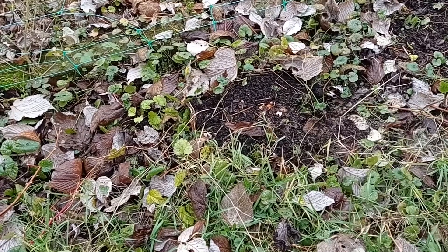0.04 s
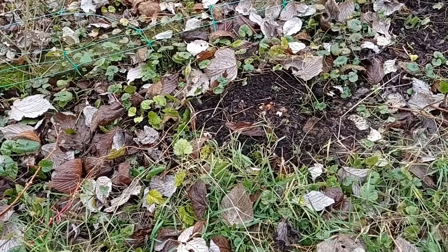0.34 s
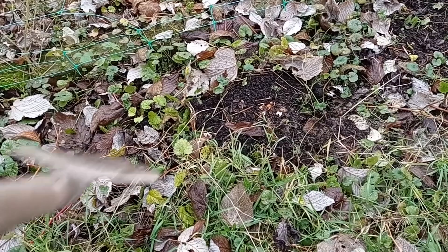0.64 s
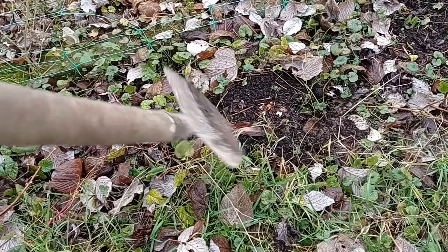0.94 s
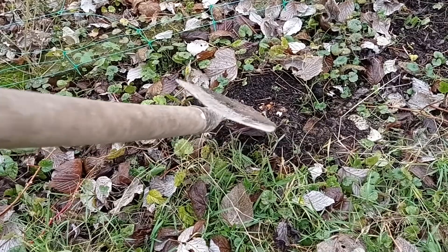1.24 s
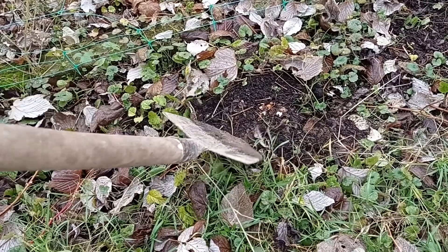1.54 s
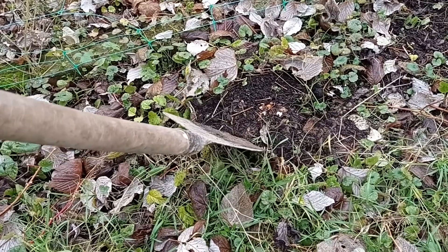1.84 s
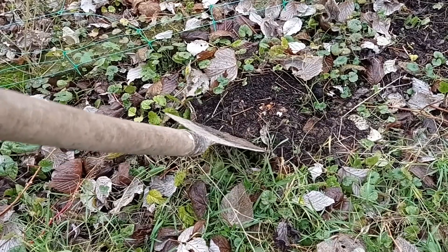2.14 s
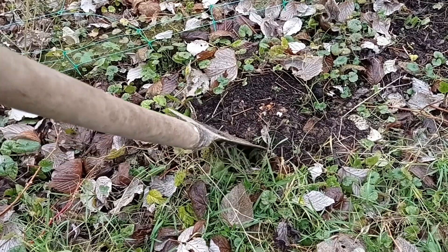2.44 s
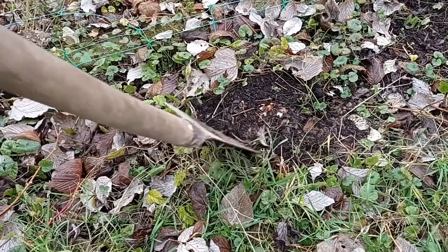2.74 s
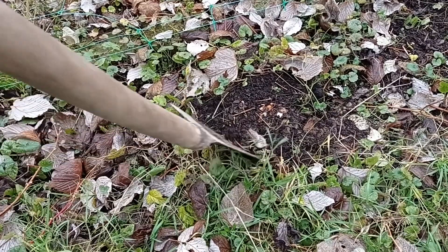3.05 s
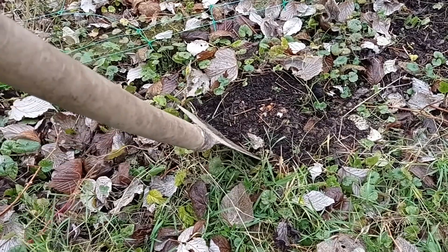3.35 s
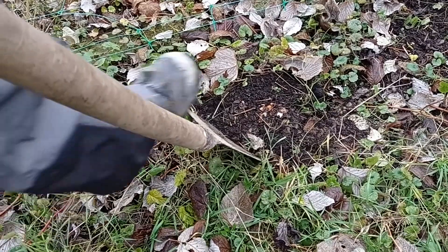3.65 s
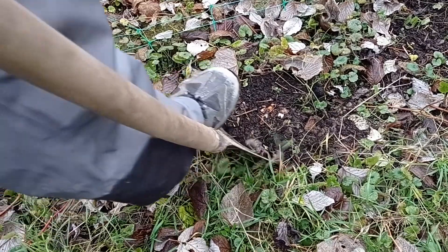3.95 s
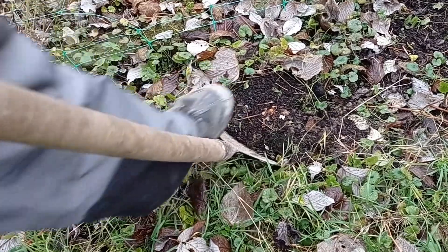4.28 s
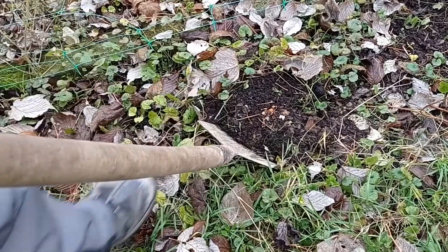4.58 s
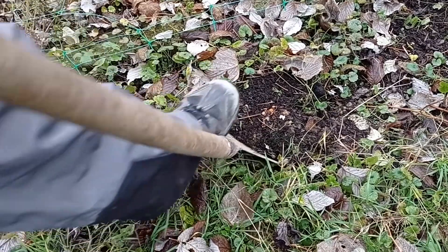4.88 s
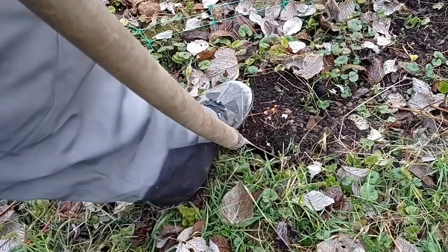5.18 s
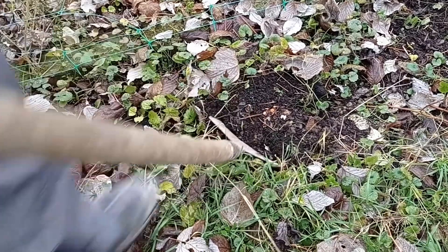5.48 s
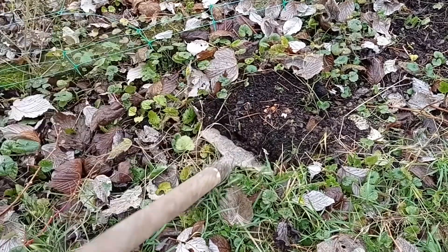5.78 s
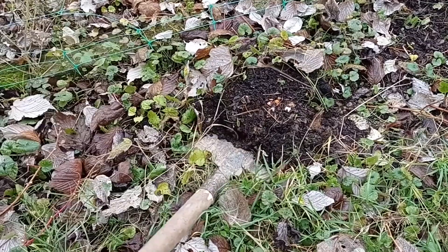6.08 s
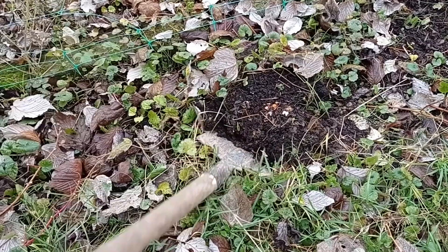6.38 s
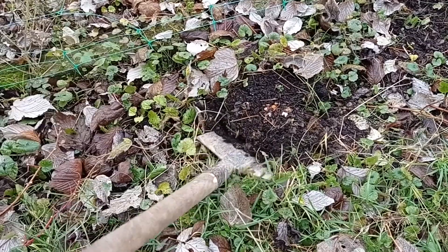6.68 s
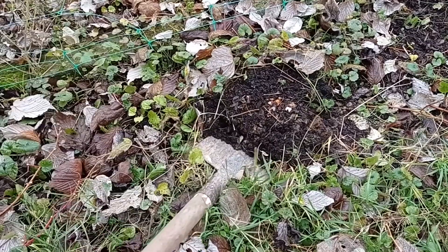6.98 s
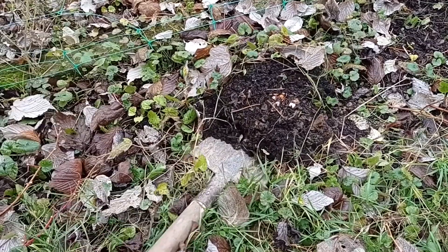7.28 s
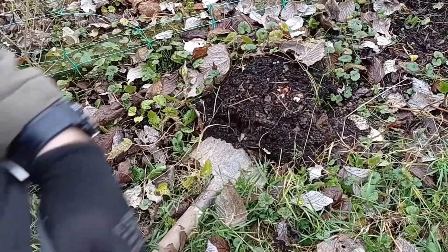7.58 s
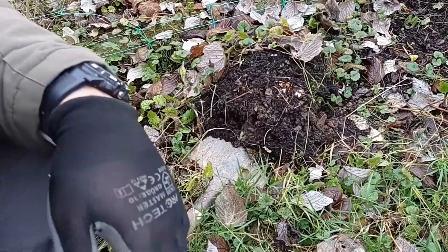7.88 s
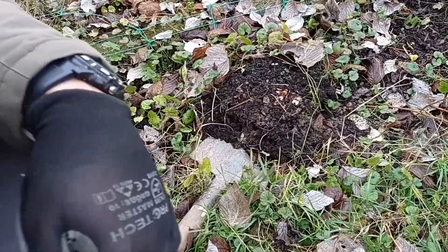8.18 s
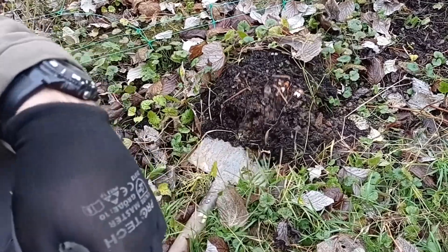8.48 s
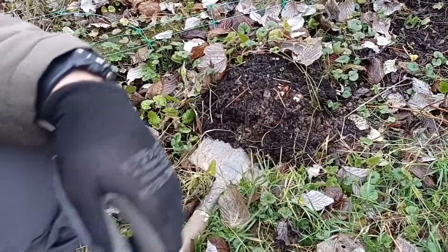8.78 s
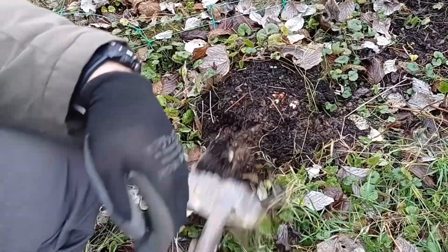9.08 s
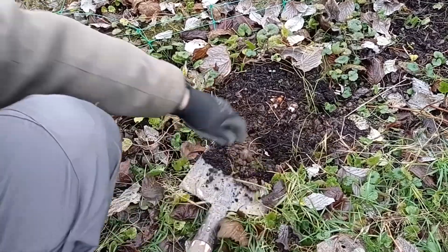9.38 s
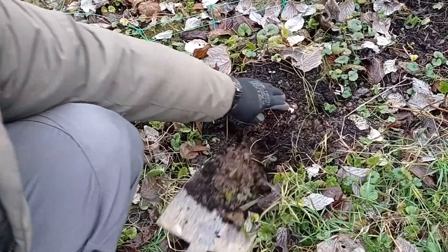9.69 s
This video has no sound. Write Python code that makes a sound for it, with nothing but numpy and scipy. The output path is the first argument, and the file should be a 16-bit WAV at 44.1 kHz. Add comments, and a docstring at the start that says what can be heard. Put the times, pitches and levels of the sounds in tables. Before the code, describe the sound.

Someone digs with a spade close to the microphone, outdoors. Short gritty jabs and small metallic clinks come first, then two heavier crunching thuds as a boot drives the blade home. Turf rips and roots break in a string of woody cracks while crumbs of earth fall. Rustling clothing, soft boot scuffs and ticking dry leaves run throughout, with still air and a faint hum behind.

```python
"""A boot steps on a leafy garden bed with a short crunch; then a steel spade is set in. It grates on grit
and clinks on stones, which excite its damped modes, and is trodden in twice with a dull boom.
As it is levered back the sod tears and roots snap, each fracture an impulse that rings wood and soil.
Boots scuff, leaves crackle, crumbs fall, and friction makes the digger's clothes swish close by.
Behind it all lie quiet open air and a faint low hum."""
import sys
import numpy as np
from scipy import signal
from scipy.fft import rfft, irfft
from scipy.io import wavfile

SR = 44100
rng = np.random.default_rng(int(sys.argv[2]) if len(sys.argv) > 2 else 0)


def unload_wav(signal):
    """Save mono or channel-first audio to the path in sys.argv[1] as 16-bit WAV at rate SR, clipped to [-1, 1]."""
    wavfile.write(
        sys.argv[1],
        SR,
        np.round(np.clip(np.atleast_2d(signal).T, -1, 1) * 32767).astype(np.int16),
    )


N = 429093

# A boot (first row), then the blade, crushes the sod.
# Each row: start and length in seconds, then crunch, grit, thud and swell in dB.
SOD_CRUSHES = [(0.027, 0.051, -54.5, -48.5, -46, -3), (0.897, 0.084, -49, -41, -53, -24),
               (3.867, 0.1, -50.5, -55, -65, 8), (3.995, 0.066, -38, -46, -50.5, -1),
               (4.053, 0.052, -34, -32.5, -45, -5), (4.137, 0.036, -40.5, -42, -42, 6),
               (5.12, 0.029, -45, -50, -43.5, 8), (5.16, 0.062, -34, -31.5, -36, 6.5),
               (9.343, 0.025, -43.5, -48, -58, 13)]
# Jabs against grit. Each row: peak time in seconds, crunch, bright edge and thud in dB,
# rise time and 60 dB decay time in seconds.
GRIT_JABS = [(0.893, -37, -26.5, -35, 0.0015, 0.023), (1.415, -46, -23.5, -85, 0.0011, 0.088),
             (1.471, -47.5, -38.5, -87, 0.0028, 0.097), (2.171, -50, -36.5, -80, 0.001, 0.014),
             (2.368, -61, -41, -81, 0.0024, 0.12), (2.404, -45.5, -53, -64, 0.003, 0.041),
             (2.615, -37, -25.5, -60, 0.0083, 0.028), (2.639, -51, -42, -55, 0.011, 0.072),
             (2.662, -47, -26.5, -58, 0.0066, 0.02), (2.869, -57, -38.5, -70, 0.012, 0.09),
             (2.88, -32.5, -31, -41.5, 0.002, 0.065), (2.921, -46.5, -54, -66, 0.0009, 0.016),
             (2.994, -64, -45, -88, 0.0072, 0.044), (3.113, -58, -32, -64, 0.0018, 0.052),
             (3.122, -29.5, -28, -40, 0.0016, 0.029), (3.793, -52.5, -51, -91, 0.00075, 0.19),
             (3.878, -48.5, -59, -81, 0.0015, 0.046), (3.965, -37.5, -34, -56, 0.0009, 0.019),
             (4.016, -30, -20.5, -59, 0.0022, 0.024), (4.061, -27.5, -31, -60, 0.011, 0.03),
             (4.144, -32, -42, -54, 0.0064, 0.061), (4.954, -58, -42.5, -80, 0.006, 0.04),
             (5.217, -23.5, -23, -49, 0.0072, 0.048), (6.713, -31.5, -40, -77, 0.00075, 0.028),
             (6.739, -39, -39, -77, 0.004, 0.04), (9.346, -32, -58, -57, 0.0039, 0.062),
             (9.441, -34, -31, -67, 0.0014, 0.027)]
# Steel striking stone. Each row: time in seconds, level in dB, most strongly excited frequency in Hz.
STONE_STRIKES = [(1.415, -26, 5130), (1.424, -27.5, 5500), (1.47, -53, 3200), (2.17, -46.5, 6700),
                 (2.612, -24, 4540), (2.658, -30, 3500), (2.88, -22.5, 1490), (3.113, -46, 2800),
                 (3.122, -22, 1080), (4.015, -33, 7000)]
# Modes of the steel blade. Each row: frequency in Hz, bandwidth in Hz, level in dB.
BLADE_MODES = [(835, 49, -3.5), (1370, 87, -9), (1985, 33, -8.5), (2246, 45, -1), (2680, 50, -9),
               (2930, 57, -7.5), (3200, 52, -21), (4630, 55, -7), (5110, 89, -2), (5750, 60, 2.5),
               (6375, 130, 2.5), (7550, 150, -12), (6600, 80, 0), (7670, 70, -33)]
# How freely the blade rings; soil damps it as it sinks. Each row: time in seconds, gain in dB.
BLADE_FREEDOM = [(0, 1.5), (0.95, -1.5), (1.3, 6), (2.7, 10.5), (3.1, -12), (4.0, -8), (5.2, -33),
                 (9.73, 5.5)]
# The boot rams the blade home. Each row: start in seconds, length in seconds, level in dB.
BOOT_TREADS = [(4.143, 0.016, -41.5), (5.158, 0.06, -35)]
# The levered turf tears. Each row: start and length in seconds, level and swell in dB.
SOD_TEARS = [(6.412, 0.147, -45.5, 11.5), (6.57, 0.059, -31.5, 3.5), (6.681, 0.049, -40.5, 4.5),
             (6.733, 0.052, -37, 2.5), (9.056, 0.062, -48, 9), (9.119, 0.051, -37, -3),
             (9.16, 0.06, -49, -16), (9.35, 0.033, -45.5, 11)]
# Roots and twigs break. Each row: time in seconds, thump, knock and crack in dB, knock pitch in Hz.
ROOT_SNAPS = [(1.2517, -52, -56, -73, 865), (4.612, -70, -47.5, -67, 1000), (5.125, -58, -30, -37, 1440),
              (5.142, -43, -48, -27.5, 814), (5.2478, -53, -40, -38, 770), (5.4355, -48, -42.5, -42, 1420),
              (5.5865, -77, -42, -45, 930), (5.6974, -63, -30.5, -36, 740), (5.7243, -76, -33, -33, 1400),
              (5.7905, -50, -38, -46.5, 940), (5.896, -49, -33, -37, 1180), (5.998, -54, -40, -35, 840),
              (6.065, -47, -57, -52, 1080), (6.0833, -51, -39.5, -46, 1020), (6.2024, -55, -54.5, -41, 820),
              (6.2907, -47, -54, -58, 1030), (6.9226, -70.5, -36, -51, 1050),
              (7.1664, -39, -18.5, -22.5, 685), (7.252, -51, -40, -37.5, 1370),
              (7.2815, -42, -35, -52, 875), (7.304, -39.5, -36, -39, 800), (7.3597, -45, -36.5, -39, 830),
              (7.4043, -64, -38, -38, 1540), (7.4758, -50, -52, -42, 1100), (7.603, -28, -25.5, -22.5, 610),
              (7.6499, -35, -58, -55, 820), (7.8706, -28.5, -22, -23.5, 770),
              (7.9083, -40.5, -35.5, -58, 1240), (8.4865, -73.5, -46, -40, 1090),
              (8.5265, -39, -21.5, -22.5, 1490), (8.558, -49, -34, -42, 1460), (8.609, -54, -39, -39, 1180),
              (9.154, -75, -30, -32, 1210), (9.415, -69, -31, -51, 1500)]
# Boots scuff damp ground. Each row: time in seconds, level in dB, pitch in Hz.
BOOT_SCUFFS = [(0.16, -45.5, 595), (0.195, -45, 435), (0.271, -48.5, 566), (0.3, -52, 690), (0.5, -50, 486),
               (0.528, -48, 670), (0.809, -51, 780), (1.234, -54, 334), (1.832, -51, 560),
               (3.29, -47.5, 580), (3.36, -50, 640), (3.828, -53.5, 640), (5.03, -52.5, 620),
               (5.927, -48, 580.0), (5.962, -56, 455), (8.593, -39, 504), (8.971, -42.5, 830)]
# How much the bed is disturbed. Each row: time in seconds, level in dB.
DISTURBANCE = [(0.0, -57.5), (0.51, -78.5), (0.89, -69.5), (1.05, -74), (1.54, -83.5), (3.87, -76),
               (4.04, -66), (4.63, -80.5), (4.93, -75), (5.25, -59.5), (5.55, -67), (5.96, -60),
               (6.23, -69), (7.13, -63.5), (7.43, -58), (8.86, -64), (8.97, -58), (9.73, -63)]
# Clods slump and crumble. Each row: start in seconds, length in seconds, level in dB.
CLOD_SLUMPS = [(0.172, 0.13, -61.5), (0.506, 0.11, -66), (1.828, 0.06, -69), (5.755, 0.031, -57),
               (7.28, 0.093, -55), (7.6, 0.073, -49), (7.83, 0.27, -58), (8.154, 0.063, -70),
               (8.51, 0.09, -54.5), (9.0, 0.08, -61)]
# How much the digger moves. Each row: time in seconds, level in dB.
BODY_MOTION = [(0.0, -60), (0.81, -48.5), (1.03, -60), (1.54, -62), (2.68, -74), (3.2, -74), (3.82, -66.5),
               (4.04, -51), (4.66, -67.5), (5.94, -53), (6.45, -54), (6.61, -53.5), (6.8, -56.5),
               (7.56, -54), (8.16, -59.5), (8.83, -54.5), (9.16, -53.5), (9.73, -52)]
# A sleeve or trouser leg sweeps past. Each row: start and length in seconds, level and swell in dB.
LIMB_SWEEPS = [(0.04, 0.33, -57, -2), (0.48, 0.12, -53.5, 2), (0.744, 0.115, -48, 8),
               (0.974, 0.28, -58, -8), (1.333, 0.12, -54.5, 3), (1.625, 0.32, -53, -3.5),
               (2.031, 0.053, -57.5, 3), (2.14, 0.15, -61.5, 1), (2.308, 0.085, -54.5, 3),
               (2.482, 0.014, -61.5, 13), (2.762, 0.016, -57.5, 5), (2.994, 0.041, -61, -8),
               (3.146, 0.23, -48.5, 0), (4.252, 0.15, -53, 0), (4.44, 0.12, -58.5, 2),
               (4.645, 0.033, -65, 0), (4.8, 0.3, -61.5, 11), (5.285, 0.3, -58.5, -1),
               (5.573, 0.85, -55.5, -5.5), (6.326, 0.076, -65, -10), (6.818, 0.23, -60, -11),
               (7.05, 0.17, -54.5, -5), (7.324, 0.16, -50.5, -4), (7.51, 0.64, -58.5, -7),
               (8.12, 0.11, -86, -3), (8.414, 0.17, -53, 15), (8.881, 0.14, -54, 9.5),
               (9.083, 0.14, -46.5, -1.5), (9.268, 0.056, -45, 3.5), (9.43, 0.079, -61, -22),
               (9.637, 0.082, -48.5, -1.5)]
# A far hum swells and fades. Each row: time in seconds, level in dB.
HUM_LEVELS = [(0.0, -75), (0.19, -68), (1.84, -100), (2.09, -73), (3.28, -68), (3.98, -81), (4.09, -74),
              (4.77, -87), (5.2, -54), (5.8, -79), (5.94, -64), (6.29, -97), (6.61, -74), (6.96, -86),
              (7.78, -58), (8.05, -75), (8.24, -60.5), (9.73, -61)]

# Spectra. Each row: frequency in Hz, gain in dB.
CRUNCH_SPECTRUM = [(200, -52.5), (550, -12.5), (950, 1.5), (1400, 0), (2100, 5), (3200, -1), (4500, -6),
                   (8000, -9.5), (16000, -69)]   # crushed grains and fibres
SAND_SPECTRUM = [(1800, -21), (3200, 4.5), (4200, 3.5), (7000, 2), (9000, 2.5), (16000, 0)]   # grit inside the soil
EDGE_SPECTRUM = [(1800, -25), (3200, -10.5), (4200, -8), (7000, -0.5), (16000, -3.5)]   # brighter grit at the bare edge
THUD_SPECTRUM = [(35, -29), (70, -9), (150, 2), (270, -1.5), (400, -6.5), (560, -4.5), (900, -12),
                 (2500, -28.5)]   # struck soil
TURF_SPECTRUM = [(200, -30), (550, -9.5), (950, -1.5), (1500, -2.5), (2300, -2.5), (3300, -1.5),
                 (4500, -1.5), (6500, -2.5), (9000, -16), (16000, -15)]   # breaking grass roots
CRUMB_SPECTRUM = [(35, -27), (70, -7), (130, -1.5), (250, 1), (400, -3.5), (560, -4), (900, -11.5),
                  (2500, -37)]   # falling crumbs
FOLD_SPECTRUM = [(150, -45.5), (350, -10.5), (560, 0), (900, 2), (1400, 1), (2100, 0.5), (3200, -13.5),
                 (6000, -37.5)]   # rubbing folds of cloth
WEAVE_SPECTRUM = [(1200, -15), (2600, -1), (4000, -1.5), (6500, 1), (9000, 1), (16000, 4)]   # the sliding surface of cloth
AIR_SPECTRUM = [(25, 24.5), (60, -2.5), (130, 10), (280, -12), (700, -34), (1700, 7.5), (2800, -15),
                (7000, -8), (16000, -5)]   # still outdoor air
MICROPHONE_RESPONSE = [(25, -26), (60, -0.5), (5500, -0.5), (7100, 0.5), (8200, -7.5), (10000, -16.5),
                       (12000, -26), (13700, -29), (14800, -18), (16000, -23)]


def crushing(crunch, grit, thud):
    """Stick-slip friction: the blade and a boot crush the sod in jerks, crunching grains and fibres."""
    jerks = rms_one(from_db(2 * drift(per_s=300)))
    fibres = colour(grains(per_s=2600, spread_db=1.5), CRUNCH_SPECTRUM)
    fibres = hollows(fibres, patchy_db=2.5, per_s=45)
    sand = colour(grains(per_s=7000, spread_db=3), SAND_SPECTRUM)
    sand = rms_one(scatter(sand, tail_db=-12.5, t60=0.0058))
    soil = rms_one(colour(grains(per_s=1500, spread_db=1), THUD_SPECTRUM))
    contact = jerks * (from_db(-2.5) * crunch * fibres + from_db(2) * grit * sand)
    return blade(contact, ring_db=2.5) + from_db(1) * jerks * thud * soil


def crush_forces():
    """Common excitation: one force envelope drives the crunch, grit and thud of each crush."""
    out = np.zeros((3, N))
    for start, length, *levels_db, swell_db in SOD_CRUSHES:
        force = envelope(start, length, attack_s=0.02, release_s=0.03, swell_db=swell_db)
        out += np.outer(from_db(levels_db), force)
    return out


def jabs(drag_db=-25, drag_t60=0.29, thump_hz=240, lead_s=0.04):
    """Impact and friction: a burst of grit on steel dies fast into a weaker drag, and the soil thuds."""
    t = np.arange(SR // 4) / SR - lead_s
    before, after = np.maximum(-t, 0), np.maximum(t, 0)
    crunch, edge, thud, blows = np.zeros((4, N))
    for s, crunch_db, edge_db, thud_db, rise, t60 in GRIT_JABS:
        fall = from_db(-60 * after / t60) + from_db(drag_db - 60 * after / drag_t60)
        force = np.exp(-(before / rise) ** 2) * fall
        add(crunch, s - lead_s, force * from_db(crunch_db))
        add(edge, s - lead_s, force * from_db(edge_db))
        add(thud, s - lead_s, force * from_db(thud_db))
        add(blows, s, from_db([thud_db]))
    scrape = blade(crunch * colour(grains(per_s=11000, spread_db=2.2), CRUNCH_SPECTRUM), ring_db=1.5)
    zing = blade(edge * colour(grains(per_s=26000, spread_db=2), EDGE_SPECTRUM), ring_db=-26)
    # the ground swings once under the blow, and crumbs go on shifting
    swing = resonance(resonance(blows, thump_hz, width_hz=960), thump_hz, width_hz=1100)
    crumbs = thud * rms_one(colour(grains(per_s=6000, spread_db=-7), THUD_SPECTRUM))
    return from_db(6.5) * scrape + from_db(-0.5) * zing + from_db(40.5) * swing + crumbs


def clinks(bandwidth_oct=0.8):
    """Free vibration: a stone sets the blade ringing, and harder contacts reach higher modes."""
    t = np.arange(SR // 10) / SR
    hz, width, mode_db = np.transpose(BLADE_MODES)
    modes = np.cos(2 * np.pi * np.outer(hz, t)) * np.exp(-np.pi * np.outer(width, t))
    out = np.zeros(N)
    for s, db, bright_hz in STONE_STRIKES:
        reach = 1 / (1 + (np.log2(hz / bright_hz) / bandwidth_oct) ** 2)
        # each stone meets the blade at a different spot
        spot = from_db(2 * rng.standard_normal(len(hz))) * rng.choice([-1, 1], len(hz))
        add(out, s, (from_db(db + mode_db) * reach * spot) @ modes)
    return from_db(-5) * out


def blade(contact, ring_db):
    """Forced vibration: contacts are heard directly and through the damped modes of the steel."""
    ring = sum(from_db(db) * resonance(contact, hz, width) for hz, width, db in BLADE_MODES)
    return contact + from_db(ring_db) * gain_curve(BLADE_FREEDOM) * ring


def treads(hz=192, width_hz=236, edge_s=0.026):
    """Damped resonance: soil slips under the digger's weight, and its mass turns the slips to a boom."""
    weight = sum(from_db(db) * envelope(start, length, edge_s, edge_s)
                 for start, length, db in BOOT_TREADS)
    slips = grains(per_s=1000, spread_db=3.2)
    return weight * rms_one(resonance(resonance(slips, hz, width_hz), hz, width_hz))


def tearing(attack_s=0.0095, release_s=0.023):
    """Tensile fracture: fine roots break by the thousand, in jerks, as the sod is prised open."""
    pull = sum(from_db(db) * envelope(start, length, attack_s, release_s, swell_db)
               for start, length, db, swell_db in SOD_TEARS)
    jerks = rms_one(from_db(1.07 * drift(per_s=250)))
    fibres = colour(grains(per_s=9000, spread_db=3), TURF_SPECTRUM)
    return pull * jerks * hollows(fibres, patchy_db=5.5, per_s=45)


def snaps(thump_hz=280, overtone=3.55, crack_hz=6000):
    """Impulse response: a breaking root gives a sharp crack, a woody knock and one swing of the soil."""
    out = np.zeros(N)
    release = signal.unit_impulse(SR // 20)
    crack = rms_one(resonance(release, crack_hz, width_hz=16600))
    thump = rms_one(resonance(release, thump_hz, width_hz=390))
    for s, thump_db, knock_db, crack_db, hz in ROOT_SNAPS:
        wood = resonance(release, hz, 0.5 * hz) - 1.26 * resonance(release, overtone * hz, 2.4 * hz)
        knock = rms_one(resonance(wood, hz, 2.2 * hz))   # the soil muffles the wood
        snap = (from_db(thump_db - 13) * thump
                + from_db(knock_db - 20.5) * knock
                + from_db(crack_db - 18) * crack)
        add(out, s, scatter(snap, tail_db=1.5, t60=0.0097))
    return ground_echo(out, lag_s=0.001307, share=0.26)


def scuffs(width_hz=170, rise_s=0.00467):
    """Cavity resonance: a short soft rub excites a pocket of air under the sole."""
    t = np.arange(SR // 12) / SR
    out = np.zeros(N)
    for s, db, hz in BOOT_SCUFFS:
        rub = rng.standard_normal(len(t)) * t / rise_s * np.exp(-t / rise_s)
        pocket = resonance(resonance(rub, hz, width_hz), hz, 3 * width_hz)
        add(out, s - rise_s, from_db(db + 2) * pocket / np.abs(pocket).max())
    return out


def shifting(usual_db=-62, exponent=1.4):
    """Power law: the amplitude of the earth's uneven slides grows with the disturbance of the bed."""
    disturbance = gain_curve(DISTURBANCE) / from_db(usual_db)
    slides = rms_one(from_db(2.2 * drift(per_s=25)))
    return from_db(-59) * disturbance ** exponent * slides


def leaves(shift):
    """Brittle fracture: dry leaves tick in clusters, in six frequency bands, as the ground moves."""
    activity = rms_one(from_db(3 * drift(per_s=13)))
    ticks = sum(resonance(grains(per_s=30 * activity, spread_db=4), hz, 0.8 * hz) / hz ** 1.1
                for hz in np.geomspace(800, 7000, num=6))
    return from_db(-1.5) * shift * rms_one(scatter(ticks, tail_db=8, t60=0.012))


def earth(shift, edge_s=0.051):
    """Granular impacts: crumbs from sliding earth and slumping clods make soft low bumps."""
    slumps = sum(from_db(db) * envelope(start, length, edge_s, edge_s)
                 for start, length, db in CLOD_SLUMPS)
    crumbs = rms_one(colour(grains(per_s=700, spread_db=-0.5), CRUMB_SPECTRUM))
    return np.hypot(shift, slumps) * crumbs


def clothes(attack_s=0.13, release_s=0.052):
    """Sliding friction: cloth makes countless tiny slips, dull in the folds and bright on the weave."""
    moving = gain_curve(BODY_MOTION)
    sweep_power = sum((from_db(db) * envelope(start, length, attack_s, release_s, swell_db)) ** 2
                      for start, length, db, swell_db in LIMB_SWEEPS)
    sweeps = np.sqrt(sweep_power)
    rub = np.hypot(from_db(-1.5) * moving, from_db(-10.5) * sweeps)
    swish = np.hypot(from_db(-8.5) * moving, sweeps)
    folds = colour(grains(per_s=7000, spread_db=2.5), FOLD_SPECTRUM) * from_db(1.6 * drift(per_s=45))
    weave = colour(grains(per_s=25000, spread_db=4), WEAVE_SPECTRUM) * from_db(2.2 * drift(per_s=33))
    folds = ground_echo(folds, lag_s=0.002583, share=0.35)
    return rub * rms_one(folds) + from_db(6.5) * swish * rms_one(weave)


def background(hum_hz=59.4):
    """Random modulation: a low hum wavers in pitch and level over the steady noise of outdoor air."""
    phase = 2 * np.pi * np.cumsum(hum_hz + 0.72 * drift(per_s=5)) / SR
    waver = from_db(-0.5 + 1.5 * drift(per_s=7))
    hum = waver * gain_curve(HUM_LEVELS) * np.sqrt(2) * np.sin(phase)
    air = rms_one(colour(rng.standard_normal(N), AIR_SPECTRUM))
    return hum + from_db(-63) * air


def hollows(x, patchy_db, per_s):
    """Cavity resonance: gaps between clods open and close, each at its own pitch; unit power."""
    ring = sum(resonance(x, hz, width_hz=510) * from_db(patchy_db * drift(per_s)) * rng.choice([-1, 1])
               for hz in np.geomspace(700, 7000, num=16))
    return rms_one(x + 0.37 * ring)


def scatter(x, tail_db, t60):
    """Diffuse reflection: ground, leaves and legs return a few milliseconds of echo."""
    t = np.arange(SR // 20) / SR
    tail = rng.standard_normal(len(t)) * from_db(-60 * t / t60)
    return x + from_db(tail_db) * signal.oaconvolve(x, tail / np.linalg.norm(tail))[:len(x)]


def ground_echo(x, lag_s, share):
    """Comb filtering: a nearby reflection, its path changing as things move, interferes with the sound."""
    n = np.arange(N)
    lag = lag_s * SR * from_db(2 * drift(per_s=3))
    return x + share * np.interp(n - lag, n, x)


def grains(per_s, spread_db):
    """Shot noise: random clicks of unequal size, at unit power."""
    sizes = from_db(spread_db * np.minimum(rng.exponential(1, N), 4.5))
    return rms_one(sizes * rng.choice([-1, 1], N) * (rng.random(N) < per_s / SR))


def drift(per_s):
    """Interpolated noise: a smooth random fluctuation of unit power."""
    knots = rng.standard_normal(N // 40)
    return rms_one(np.interp(np.arange(N) / SR * per_s, np.arange(len(knots)), knots))


def resonance(x, hz, width_hz):
    """Damped oscillator: a two-pole filter with a peak gain of 1."""
    r = np.exp(-np.pi * width_hz / SR)
    numerator = np.array([1, 0, -1]) * (1 - r * r) / 2
    denominator = [1, -2 * r * np.cos(2 * np.pi * hz / SR), r * r]
    return signal.lfilter(numerator, denominator, x + 1e-18)


def colour(x, spectrum, size=4096):
    """Minimum-phase filtering: folding the cepstrum gives a causal response with the given spectrum."""
    hz, db = np.transpose(spectrum)
    grid = np.maximum(np.arange(size // 2 + 1) * SR / size, 1)
    magnitude = from_db(np.interp(np.log(grid), np.log(hz), db))
    cepstrum = irfft(np.log(magnitude))
    cepstrum[1:size // 2] *= 2
    cepstrum[size // 2 + 1:] = 0
    return signal.oaconvolve(x, irfft(np.exp(rfft(cepstrum))))[:len(x)]


def envelope(start, length, attack_s, release_s, swell_db=0):
    """Exponential rise and decay, 20 dB per attack_s or release_s; the hold changes by swell_db."""
    t = np.arange(N) / SR - start
    outside = np.maximum(-t, 0) / attack_s + np.maximum(t - length, 0) / release_s
    hold_db = swell_db * (np.clip(t / length, 0, 1) - 0.5)
    return from_db(hold_db - 20 * np.minimum(outside, 10))


def gain_curve(rows):
    """Interpolation in decibels gives a gain at every sample."""
    s, db = np.transpose(rows)
    return from_db(np.interp(np.arange(N) / SR, s, db))


def from_db(db):
    """Amplitude grows tenfold per 20 dB."""
    return 10 ** (np.asarray(db) / 20)


def rms_one(x):
    """Normalisation to unit power."""
    return x / np.sqrt(np.mean(x ** 2) + 1e-20)


def add(track, s, sound):
    """Superposition of a short sound at s seconds."""
    start = max(round(s * SR), 0)
    track[start:start + len(sound)] += sound[:N - start]


def scene():
    """Superposition: spade, boots, ground, clothes and background sum at one nearby point."""
    crunch, grit, thud = crush_forces()
    shift = shifting()
    digging = crushing(crunch, grit, thud) + jabs() + clinks() + treads()
    ground = tearing() + snaps() + scuffs() + leaves(shift) + earth(shift)
    return (digging + ground + clothes() + background())[None]


def record(dry, cutoff_hz=16000):
    """Band limiting: a small microphone has a dip in the high treble and a steep top cut."""
    heard = np.array([colour(channel, MICROPHONE_RESPONSE) for channel in dry])
    return signal.sosfilt(signal.ellip(10, 0.3, 70, cutoff_hz, fs=SR, output="sos"), heard)


dry = scene()
out = record(dry)
unload_wav(out)
```